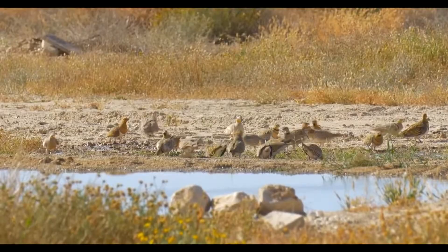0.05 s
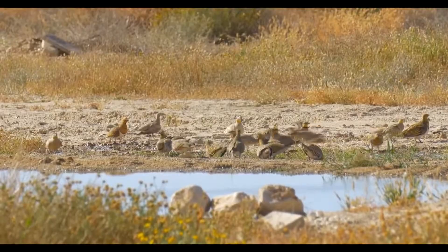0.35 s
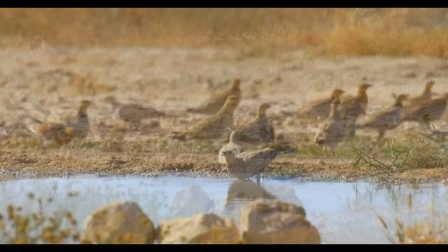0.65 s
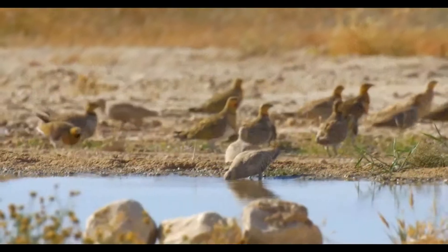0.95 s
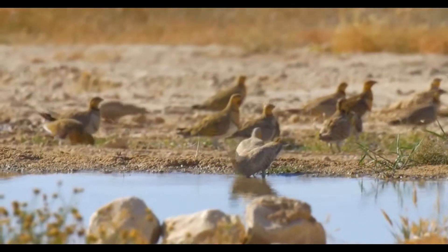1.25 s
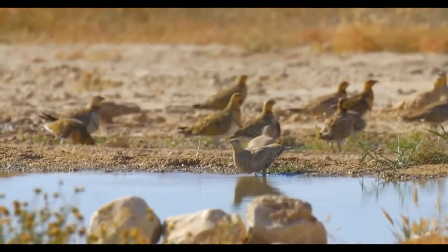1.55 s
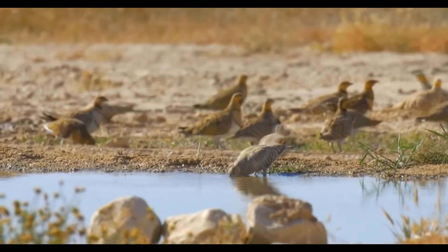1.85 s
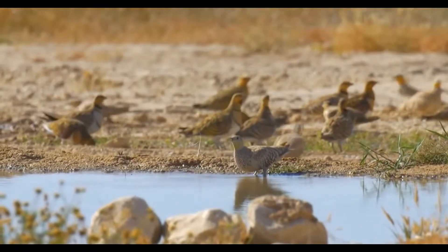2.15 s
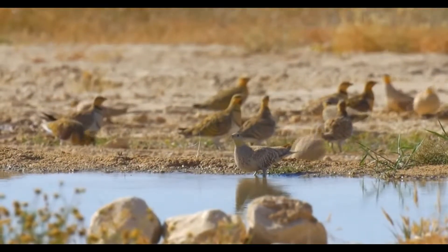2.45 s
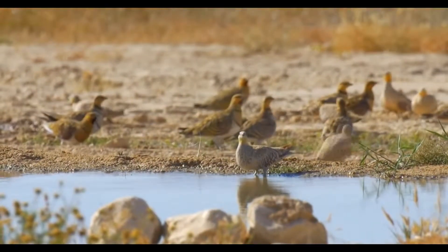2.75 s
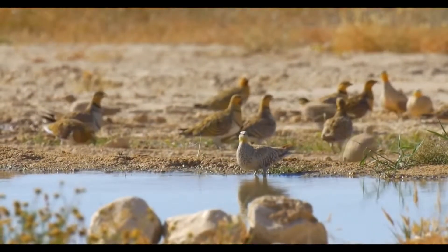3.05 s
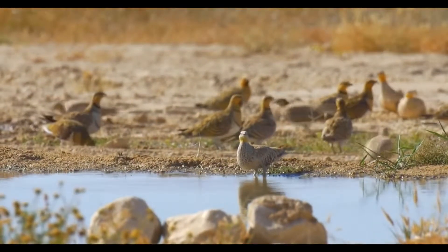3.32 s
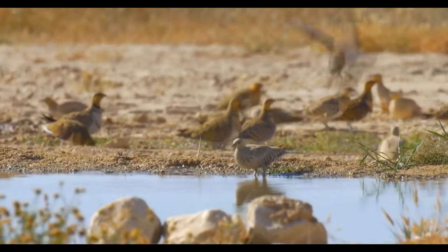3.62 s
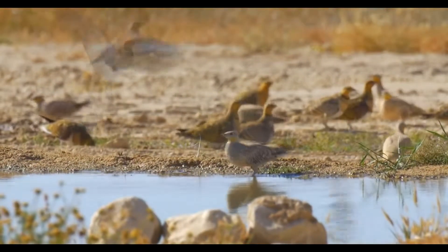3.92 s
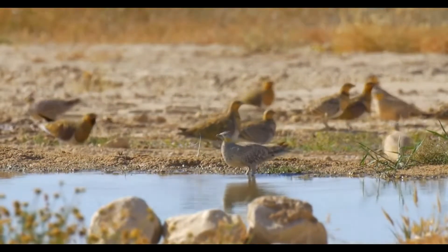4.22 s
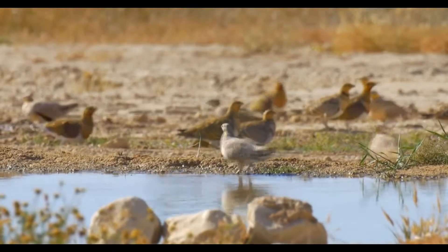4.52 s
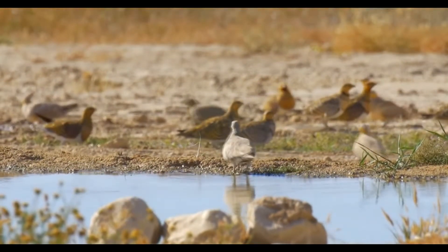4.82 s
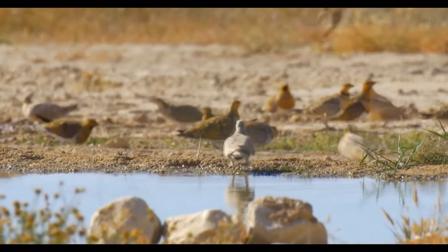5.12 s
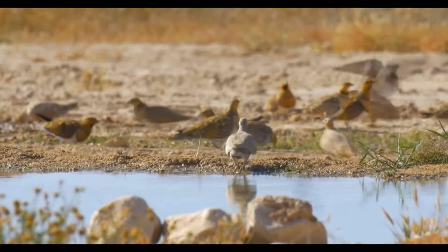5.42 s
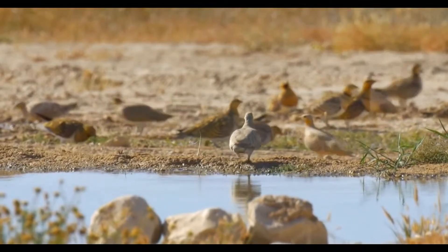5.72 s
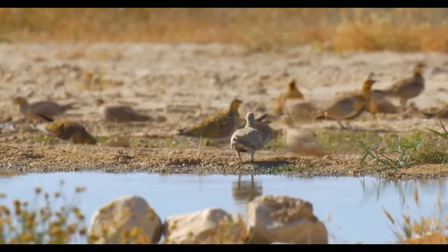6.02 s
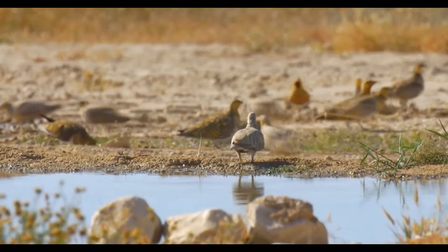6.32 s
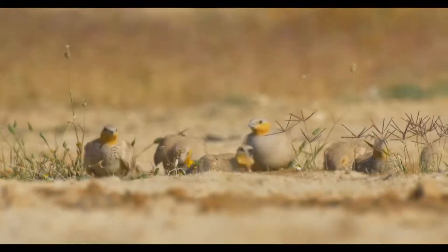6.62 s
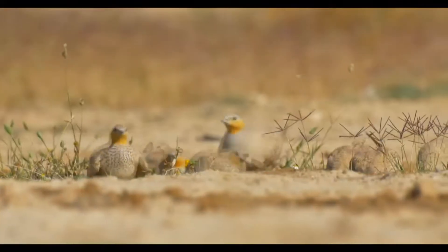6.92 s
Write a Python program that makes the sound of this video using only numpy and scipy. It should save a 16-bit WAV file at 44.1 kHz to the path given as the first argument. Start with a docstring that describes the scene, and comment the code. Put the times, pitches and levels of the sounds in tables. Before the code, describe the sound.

Birds call with quick rising and falling notes above rumbling wind and far-off engines, until a heavy thump overloads the microphone.

```python
"""Sandgrouse call at a desert waterhole, often overlapping: a quick upward flick, then a falling note.
Each voice is a stack of harmonics (multiples of one pitch) shaped by the throat. A small songbird
rasps twice with a buzzing tone and another whistles. Distant engines drone under a low rumble of wind.
Near the end a heavy thump close to the microphone overloads it."""
import sys
import numpy as np
from scipy import signal
from scipy.fft import rfft, irfft, next_fast_len
from scipy.io import wavfile

SR = 44100
rng = np.random.default_rng(int(sys.argv[2]) if len(sys.argv) > 2 else 0)


def wrap_up_sound(samples):
    """Save the sound to the file named by the first command line argument, as 16-bit audio."""
    columns = np.atleast_2d(samples).T
    # keep every value between -1 and 1, then stretch to whole-number steps
    tamed = np.clip(columns, -1, 1)
    steps = np.round(tamed * 32767).astype(np.int16)
    wavfile.write(sys.argv[1], SR, steps)


N = 311344
TIME = np.arange(N) / SR

# How the throat shapes a full call. Each row: frequency in Hz, gain in dB.
OPEN_THROAT = [(450, -20.5), (700, -5), (900, -2), (1200, -1.5), (1650, -1.5), (2200, -25.5), (3300, -27.5),
               (5000, -49)]
# How it shapes a nasal note. Each row: frequency in Hz, gain in dB.
NASAL_THROAT = [(450, -19), (700, 12), (950, 3), (1250, 2), (1600, -2), (2100, -3), (2450, -6.5),
                (4500, -27)]


def sandgrouse():
    """Several birds give two-part calls, with soft nasal notes and one wail between them."""
    # Each row: start in seconds, pitch in Hz, flick's top in Hz, flick's length in seconds, its level
    # in dB, delay until the fall in seconds, fall's length in seconds, its level in dB, yelp gain in dB.
    calls = [(1.278, 849, 1843, 0.044, -50.5, 0.094, 0.13, -58.5, 1),
             (1.696, 714, 1425, 0.063, -58.5, 0.09, 0.13, -59.5, -3),
             (2.348, 683, 1164, 0.033, -58, 0.11, 0.19, -59.5, 4),
             (2.782, 870, 1663, 0.061, -43, 0.12, 0.15, -51.5, 2.5),
             (3.327, 788, 1720, 0.058, -51.5, 0.12, 0.14, -54.5, -3),
             (3.537, 840, 1840, 0.047, -51.5, 0.089, 0.16, -60, 3),
             (4.674, 883, 1650, 0.06, -43.5, 0.116, 0.14, -53.5, 3.5),
             (4.735, 820, 1810, 0.053, -46, 0.12, 0.15, -52, -6),
             (6.157, 833, 1680, 0.056, -49, .09, 0.17, -55, 6.5),
             (6.323, 802, 1586, 0.04, -57.5, 0.084, 0.1, -59.5, -12),
             (6.362, 832, 1470, 0.053, -49.5, 0.099, 0.061, -50.5, -1),
             (6.883, 719, 1480, 0.051, -51.5, 0.14, .1, -50.5, -7)]
    # Each row: start and length in seconds, first and last pitch in Hz, level in dB, favoured harmonic.
    murmurs = [(1.483, 0.05, 709, 702, -63.5, 2.34), (3.966, 0.068, 545, 573, -64.5, 2.7),
               (4.031, 0.083, 556, 508, -67.5, 2.74), (5.251, 0.067, 569, 638, -65, 2),
               (5.341, 0.053, 610, 607, -65, 2), (5.844, 0.06, 593, 638, -62.5, 1.82),
               (5.945, 0.042, 570, 580, -62.5, 2.6), (6.02, 0.047, 650, 605, -66.5, 3.6)]
    out = np.zeros(N)
    for start, hz, top_hz, flick_s, flick_db, delay, fall_s, fall_db, yelp_db in calls:
        add(out, start, flick(flick_s, hz, top_hz, flick_db))
        add(out, start + delay, fall(fall_s, hz, delay, fall_db, yelp_db))
    for start, *note in murmurs:
        add(out, start, murmur(*note))
    return out + wail()


def flick(length, pitch_hz, top_hz, db):
    """The voice climbs softly, breaks about an octave upward, then arches over."""
    break_at, crest_at = .465, .646  # shares of the length
    progress = np.linspace(0, 1, int(length * SR))
    high = .5 + .5 * np.tanh((progress - break_at) / .038)  # 0 before the break, 1 after
    climb_left = 1 - np.minimum(progress / break_at, 1)
    low_hz = pitch_hz * (1.03 - .28 * climb_left ** 1.41)
    low_db = -3.5 - 11.5 * climb_left ** 3
    from_crest = abs(progress - crest_at) / (1 - crest_at)
    high_hz = top_hz * (1 - .38 * from_crest ** 2.2)
    high_db = 3 - 18.5 * from_crest ** 4
    hz = low_hz + high * (high_hz - low_hz)
    level_db = db + low_db + high * (high_db - low_db)
    return voice(hz, level_db, OPEN_THROAT, lead=2 - high, jitter=.004, tilt_db=-7)


def fall(length, pitch_hz, delay, db, yelp_db, yelp_hz=1341, yelp_s=.014, release_s=.013):
    """A high yelp drops at once into a long sinking note; the beak closes as the pitch sinks."""
    t = np.arange(int(length * SR)) / SR
    yelp = np.exp(-(t / yelp_s) ** 6)
    since = np.maximum(t - yelp_s, 0)
    # The pitch slips quickly, then sinks and droops; a hurried call (short delay) sinks faster.
    slip = 1 - np.exp(-since / .0218)
    sag = (1 - .11 * slip) * np.exp(-.18 * since / delay - .1 * (since / delay) ** 3)
    hz = yelp * yelp_hz + (1 - yelp) * pitch_hz * sag * (1 + .014 * wander(25, len(t)))
    swell_db = -.5 * (1 - slip) - 13.5 * (t / length) ** 3
    level_db = db + yelp * yelp_db + (1 - yelp) * swell_db
    # Low-pitched birds are hoarse: their pitch shakes and the upper harmonics take over.
    hoarse = np.interp(pitch_hz, [700, 830], [1, 0])
    lead = 2 - yelp + hoarse * (.5 + t / length)
    note = voice(hz, level_db, OPEN_THROAT, lead=lead, mouth=1 - .36 * (1 - sag),
                 jitter=.0068 + .03 * hoarse, tilt_db=-4, shimmer_db=1)
    return note * np.minimum((length - t) / release_s, 1)


def murmur(length, first_hz, last_hz, db, lead):
    """A wavering nasal note whose pitch and level droop at both ends."""
    progress = np.linspace(0, 1, int(length * SR))
    edge = abs(2 * progress - 1) ** 4
    hz = (first_hz + progress * (last_hz - first_hz)) * (1 - .13 * edge)
    return voice(hz, db - 14 * edge, NASAL_THROAT, lead=lead, jitter=.031, tilt_db=-9.5, shimmer_db=1)


def wail(resonance_hz=1970):
    """A long nasal note cracks upward, wavers and sinks, favouring harmonics near one resonance."""
    # Each row: time in seconds, pitch in Hz, level in dB.
    curve = [(5.305, 519, -61), (5.323, 708, -58), (5.358, 669, -57.5), (5.395, 705, -61.5),
             (5.42, 646, -58.5), (5.444, 526, -67), (5.503, 468, -67.5), (5.52, 410, -71)]
    start, end = curve[0][0], curve[-1][0]
    hz, db = follow(curve, np.arange(start, end, 1 / SR))
    note = voice(hz, db, NASAL_THROAT, lead=resonance_hz / hz, jitter=.01, tilt_db=-7, shimmer_db=1.5)
    out = np.zeros(N)
    add(out, start, note)
    return out


def voice(hz, db, throat, lead=2, mouth=1, jitter=.008, tilt_db=-3, shimmer_db=1.6):
    """A bird's voice box makes six harmonics; the throat filters them and the mouth shifts that filter."""
    size = len(hz)
    hz = hz * (1 + jitter * wander(250, size))
    phase = 2 * np.pi * (np.cumsum(hz) / SR + rng.random())
    tone = np.zeros(size)
    for k in range(1, 7):
        favour = amp(tilt_db * abs(k - lead))  # weaker away from the lead harmonic
        tone += colour(throat, k * hz / mouth) * favour * np.sin(k * phase)
    return np.sqrt(2) * tone * amp(db + shimmer_db * wander(130, size)) * fade(size)


def rasps(buzz_hz=292.5, wisp_hz=4600, wisp_s=.07):
    """A songbird's husky whistle, shaken by a fast buzz, leaps up twice and settles low."""
    # Each row: start in seconds, level in dB.
    notes = [(3.553, -55.5), (5.0, -58.5)]
    # Each row: time into the rasp in seconds, pitch in Hz, gain in dB.
    shape = [(.004, 4700, -18), (.019, 4800, -8), (.023, 3200, -5), (.033, 4700, 4), (.041, 2950, -6),
             (.048, 4100, 9), (.058, 2500, -11), (.066, 2800, 6), (.073, 3150, 2), (.081, 2700, 6),
             (.088, 3200, -6), (.105, 3000, -20)]
    out, t = np.zeros(N), np.arange(0, shape[-1][0], 1 / SR)
    hz, shape_db = follow(shape, t)
    for start, db in notes:
        buzz = np.sin(2 * np.pi * buzz_hz * t + wander(220, len(t)))
        shake = 1 + .03 * buzz + .055 * np.tanh(wander(1100, len(t)))
        phase = 2 * np.pi * np.cumsum(hz * shake) / SR
        husk = wander(900, len(t)) * np.sin(phase + wander(900, len(t)))
        tone = (np.sin(phase) + amp(-11) * husk) * amp(db + shape_db + 2.5 * buzz)
        breath = np.sin(2 * np.pi * wisp_hz * t) * wander(400, len(t))
        wisp = breath * amp(db - 8) * np.sin(np.pi * np.minimum(t / wisp_s, 1))
        add(out, start, (tone + wisp) * fade(len(t)))
    return out


def sliding_tones():
    """Tones slide over a crest: one low, faint distant call, then a songbird's high whistles."""
    # Each row: start, length and time to the crest in seconds, crest and resting pitch in Hz,
    # slide time in seconds, level in dB.
    notes = [(4.495, .128, .085, 1640, 1440, .075, -62), (6.516, .058, .015, 4470, 3480, .027, -56),
             (6.686, .08, -.009, 3650, 2480, .047, -61), (6.763, .109, .075, 3670, 2480, .05, -58),
             (7.045, .02, .017, 4500, 3300, .015, -61)]
    out = np.zeros(N)
    for start, length, crest_s, crest_hz, rest_hz, slide_s, db in notes:
        t = np.arange(int(length * SR)) / SR
        arch = np.exp(-abs((t - crest_s) / slide_s) ** 2.4)
        hz = (rest_hz + arch * (crest_hz - rest_hz)) * (1 + .009 * wander(300, len(t)))
        level_db = db - 12 + 8 * arch + 2 * wander(170, len(t))  # louder when higher
        add(out, start, sine(hz) * amp(level_db) * fade(len(t)))
    return out


def thump(rise_s=.014):
    """A soft heavy blow and its rebounds ring a few low tones, with a rustle around them."""
    # Each row: start in seconds, strength in dB.
    blows = [(6.8635, 1), (6.8756, -4.1), (6.9092, -10.7), (7.0192, -22)]
    # The ringing tones. Each row: frequency in Hz, level in dB, seconds to fade by 60 dB.
    tones = [(68.9, -5.1, 0.153), (92.8, 18, 0.044), (128.1, -17, 0.35), (256.2, 5, 0.03), (400, -12, 0.05),
             (490, -9, 0.045)]
    # Each row: time in seconds, level in dB.
    rustle_levels = [(6.835, -59), (6.876, -32.5), (6.9, -48.5), (7.06, -56)]
    out, t = np.zeros(N), np.arange(SR // 2) / SR
    ring = sum(amp(db - 60 * t / t60) * np.sin(2 * np.pi * hz * t) for hz, db, t60 in tones)
    onset = 1 - np.exp(-(t / rise_s) ** 2)
    for start, db in blows:
        add(out, start, -amp(db) * ring * onset)
    rustle = noise([(500, 14), (1000, 1.5), (3200, -9.5), (4500, -30), (9000, -61)])
    return out + rustle * amp(follow(rustle_levels, TIME)[0]) * (TIME > rustle_levels[0][0])


def peeps(length_s=.032, count=24, twitter_db=-78):
    """Small birds far off give short falling whistles: a few clear ones among faint random twitter."""
    # Each row: start in seconds, pitch in Hz, level in dB.
    clear_peeps = [(.197, 3800, -74), (1.995, 3000, -66.5), (3.15, 2790, -68.5)]
    out, progress = np.zeros(N), np.linspace(0, 1, int(length_s * SR))
    twitter = [(.76 + 10 * when, 2600 + 1500 * pitch, twitter_db)
               for when, pitch in rng.random((count, 2))]
    for start, hz, db in list(clear_peeps) + twitter:
        glide = hz * (1 - .08 * progress ** 2 + .03 * wander(250, len(progress)))
        add(out, start, amp(db) * np.sin(np.pi * progress) * sine(glide))
    return out


def far_flock(count=30, db=-78):
    """Birds further back give faint, hoarse, falling notes."""
    out = np.zeros(N)
    for when, pitch, stretch in rng.random((count, 3)):
        progress = np.linspace(0, 1, int(.05 * (1 + stretch) * SR))
        hz = (520 + 280 * pitch) * (1 - .4 * progress ** 2)
        add(out, 1 + 5.3 * when, voice(hz, db, NASAL_THROAT, jitter=.04) * np.sin(np.pi * progress))
    return out


def with_echo(sound, wet_db=-19, t60=.51):
    """Banks and bushes return a thin echo that fades by 60 dB in t60 seconds."""
    t = np.arange(SR // 2) / SR
    echoes = rng.standard_normal(len(t)) * (rng.random(len(t)) < .04)
    echoes *= (t > .012) * amp(-60 * t / t60)
    return sound + amp(wet_db) * signal.fftconvolve(sound, echoes / np.linalg.norm(echoes))[:N]


def engines(waver=.0026, flutter_db=2):
    """Far engine tones settle towards a cruising pitch, swell and fade, and flutter in the moving air."""
    # Each row: start and end in seconds, first and cruising pitch in Hz, settling time in seconds,
    # level in dB.
    tones = [(0, 3.95, 385, 405, 1.2, -60), (0, 4.2, 88, 86, 1, -49.5), (2.25, 4.15, 268, 277, .5, -56.5),
             (3.05, 5.3, 104, 220, .87, -51.5), (3.7, 9, 84, 117, 1.2, -45), (3.95, 5, 273, 314, .45, -59),
             (4.15, 9, 173, 185, 1, -54.5), (4.9, 9, 99, 108, 1, -51)]
    out = np.zeros(N)
    for start, end, first_hz, cruise_hz, settle_s, db in tones:
        t = np.clip(TIME - start, 0, end - start)
        hz = cruise_hz + (first_hz - cruise_hz) * np.exp(-t / settle_s)
        tone = np.sqrt(2) * sine(hz * (1 + waver * wander(9.5)))
        swell = abs(np.sin(np.pi * t / (end - start))) ** .21
        out += tone * swell * amp(db + flutter_db * wander(8.5))
    return out


def wind_and_hiss():
    """Wind rumbles low, a breeze stirs dry grass, and the microphone hisses."""
    # The tone of each noise. Each row: frequency in Hz, gain in dB.
    rumble_tone = [(20, -22.5), (35, -10), (85, -1), (125, -1.5), (165, -2.5), (230, -7.5), (450, -23),
                   (750, -32), (2000, -65.5)]
    breeze_tone = [(300, -44.5), (800, 11), (2300, -0.5), (3500, -1.5), (4500, -12), (7000, -42.5)]
    hiss_tone = [(6000, 10), (11500, 8), (15000, -3.5)]
    # The loudness of each noise. Each row: time in seconds, level in dB.
    rumble_levels = [(1.2, -45), (2.6, -46), (3.6, -45.5), (5.5, -48.5)]
    breeze_levels = [(.6, -77.5), (1.3, -68.5), (2.6, -72.5), (6.45, -74), (6.55, -79)]
    hiss_levels = [(.71, -110), (.73, -82.5)]
    rumble = noise(rumble_tone) * amp(follow(rumble_levels, TIME)[0] + 1.76 * wander(2.6))
    breeze = noise(breeze_tone) * amp(follow(breeze_levels, TIME)[0] + .18 * wander(13))
    hiss = noise(hiss_tone) * amp(follow(hiss_levels, TIME)[0])
    return rumble + breeze + hiss


def grit(decay_s=.002):
    """Gravel gives tiny dry ticks, each a quickly dying burst of noise."""
    # Each row: start in seconds, centre frequency in Hz, spread to each side in octaves, level in dB.
    ticks = [(4.477, 2800, 1.6, -59), (5.939, 8850, .7, -63.5)]
    out, t = np.zeros(N), np.arange(1000) / SR
    for start, hz, octaves, db in ticks:
        burst = noise([(hz / 2 ** octaves, -9), (hz, 0), (hz * 2 ** octaves, -25)])[:len(t)]
        add(out, start, burst * amp(db) * np.exp(-t / decay_s))
    return out


def amp(db):
    """Turns decibels into a gain."""
    return 10 ** (np.asarray(db) / 20)


def unit(x):
    """Scales a signal to an average (rms) level of 1."""
    return x / np.sqrt(np.mean(x ** 2) + 1e-20)


def sine(hz):
    """A pure tone that follows a changing pitch."""
    return np.sin(2 * np.pi * np.cumsum(hz) / SR)


def colour(points, hz):
    """Reads the gain at hz from rows of frequency in Hz and gain in dB."""
    freqs, db = np.transpose(points)
    return amp(np.interp(np.log(hz + 1), np.log(freqs), db))


def follow(rows, t):
    """Reads each column at times t; the first column holds the rows' times."""
    times, *columns = np.transpose(rows)
    return [np.interp(t, times, column) for column in columns]


def add(mix, start, sound):
    """Lays a sound into the mix at a start time in seconds."""
    part = mix[max(round(start * SR), 0):][:len(sound)]
    part += sound[:len(part)]


def noise(points):
    """Noise of level 1, shaped by rows of frequency in Hz and gain in dB."""
    gains = colour(points, np.fft.rfftfreq(N, 1 / SR))
    return unit(irfft(rfft(rng.standard_normal(N)) * gains, N))


def wander(rate_hz, size=N):
    """A smooth random wobble of size about 1, moving up to roughly the given rate."""
    span = next_fast_len(max(size, SR))
    smoothing = np.exp(-(np.fft.rfftfreq(span, 1 / SR) / rate_hz) ** 2)
    return unit(irfft(rfft(rng.standard_normal(span)) * smoothing, span))[:size]


def fade(size):
    """Opens and closes a note within a few milliseconds."""
    return signal.windows.tukey(size, min(1, 260 / size))


def scene():
    """Mixes the birds across the water, the background and the close thump into one channel."""
    birds = with_echo(sandgrouse() + peeps() + far_flock())
    birds += with_echo(rasps(), wet_db=-13, t60=.11)
    return (birds + sliding_tones() + engines() + wind_and_hiss() + grit() + thump())[None]


def record(dry, ceiling=.426, low_cut_hz=15, high_cut_hz=15150):
    """The microphone clips on the thump; filters then trim the deepest bass and highest treble."""
    clipped = np.clip(dry, -ceiling, ceiling)
    bass_trimmed = signal.lfilter(*signal.butter(1, low_cut_hz, "high", fs=SR), clipped)
    treble_filter = signal.firwin(511, high_cut_hz, window=("kaiser", 9), fs=SR)
    return signal.oaconvolve(bass_trimmed, treble_filter[None], "same")


dry = scene()
out = record(dry)
wrap_up_sound(out)
```